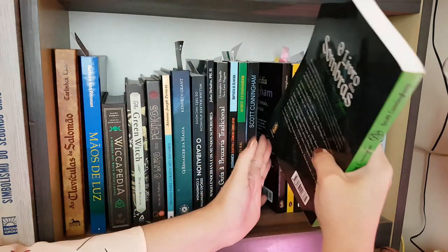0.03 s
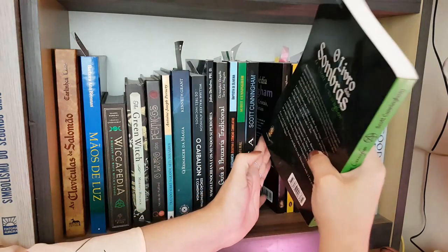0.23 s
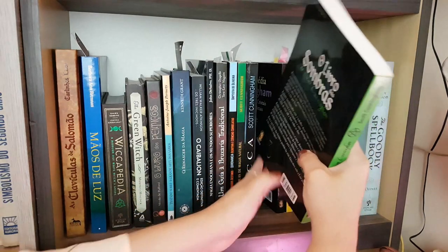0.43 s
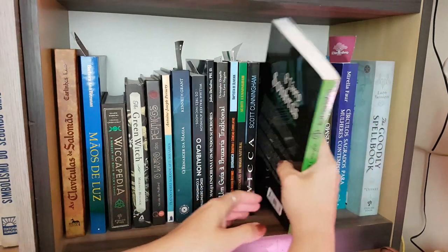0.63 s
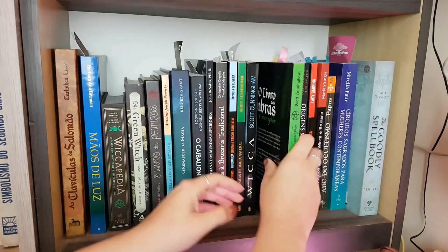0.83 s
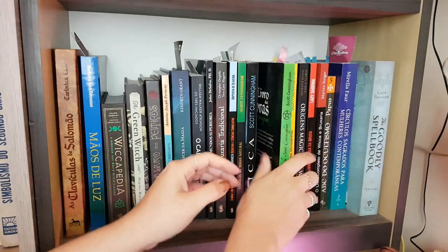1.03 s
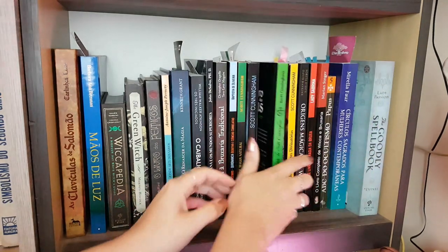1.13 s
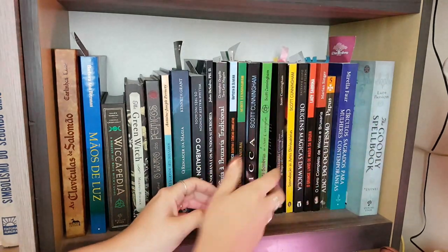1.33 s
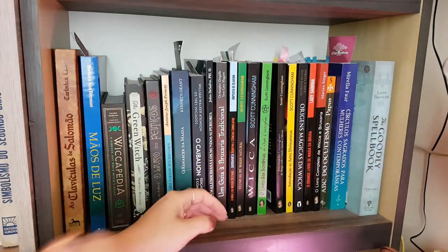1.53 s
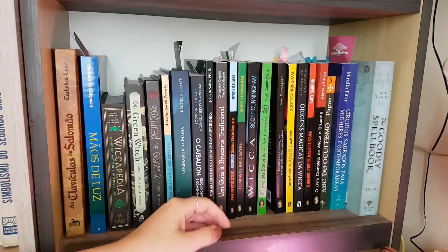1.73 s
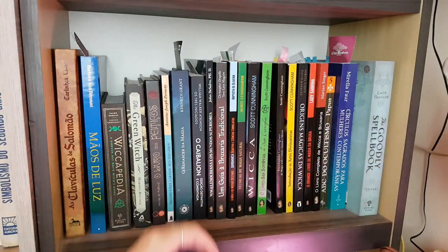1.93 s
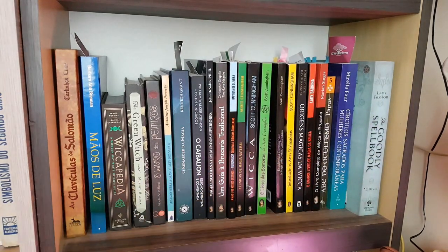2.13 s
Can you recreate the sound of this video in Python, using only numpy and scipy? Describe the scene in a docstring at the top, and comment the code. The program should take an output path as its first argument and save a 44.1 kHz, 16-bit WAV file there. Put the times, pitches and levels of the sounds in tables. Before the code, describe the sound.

A paperback is knocked into place on a wooden shelf, close to a phone in a quiet room. Light taps and brief cover creaks come from 0.05 to 0.45 s, small knocks until 0.8, then a loud clattering clack at 0.9. Covers hiss and drag from 1.0 to 1.3, ending in heavy dull thuds around 1.32-1.36. Soft hand brushing and faint ticks follow at 1.5-1.85, then near silence.

```python
"""Paperbacks are knocked into place on a wooden shelf in a quiet room, close to a phone.
Each knock is a short book tock plus ringing shelf modes; gritty noise bursts add bright clacks.
Glossy covers hiss as shaped noise and creak as stick-slip pulses; dragged books thump in tiny catches.
Hands brush, faint ticks click, and a short room tail and soft room tone lie underneath."""
import sys
import numpy as np
from scipy import signal
from scipy.fft import rfft, irfft
from scipy.io import wavfile
from scipy.ndimage import uniform_filter1d

SR = 44100
rng = np.random.default_rng(int(sys.argv[2]) if len(sys.argv) > 2 else 0)


def int16_out(signal):
    """Quantize to a 16-bit WAV file."""
    q = np.round(np.clip(np.atleast_2d(signal).T, -1, 1) * 32767)
    wavfile.write(sys.argv[1], SR, q.astype(np.int16))


def level_to_linear(level):
    """Convert decibel levels to linear amplitude factors, elementwise."""
    exponent = np.asarray(level, float) / 20
    return 10 ** exponent


N = 97020


def evened(x):
    """Scales to rms 1."""
    return x / np.sqrt(np.mean(x ** 2) + 1e-20)


def read(points, hz):
    """Reads a spectrum on a log-frequency axis."""
    f, value = np.transpose(points)
    return np.interp(np.log(hz + 1), np.log(f + 1), value)


def level(curve):
    """Turns a dB curve into a gain per sample."""
    s, db = np.transpose(curve)
    return level_to_linear(np.interp(np.arange(N) / SR, s, db))


def add(mix, s, sound):
    """Mixes a sound in at time s."""
    part = mix[..., round(s * SR):][..., :sound.shape[-1]]
    part += sound[..., :part.shape[-1]]


def rise(count, seconds):
    """A straight fade-in from 0 to 1 that then holds."""
    return np.minimum(np.arange(count) / SR / seconds, 1)


def ring(hz, t60, count):
    """One dying mode: a sine losing 60 dB in t60 seconds."""
    t = np.arange(count) / SR
    return level_to_linear(-60 * t / t60) * np.sin(2 * np.pi * hz * t)


def band(x, hz, width_hz):
    """A two-pole resonance."""
    return signal.lfilter(*signal.iirpeak(hz, hz / width_hz, SR), x)


def hiss(tone, same, patchy_db, flicker_db, size=512):
    """Stereo noise at rms 1 with drifting patches and a flicker shared by all pitches."""
    frames = N * 4 // size + 5
    hz = np.fft.rfftfreq(size, 1 / SR)
    a, b, c, d, patch = rng.standard_normal((frames, len(hz), 5)).T
    # patches span neighbouring pitches, then neighbouring moments
    patch = uniform_filter1d(patch, size=8, axis=0)
    patch = evened(uniform_filter1d(patch, size=12, axis=1))
    flicker = evened(uniform_filter1d(rng.standard_normal(frames), size=3))
    like = np.clip(read(same, hz), -1, 1)[:, None]
    left = a + 1j * b
    right = like * left + np.sqrt(1 - like ** 2) * (c + 1j * d)
    z = np.array([left, right])
    z *= level_to_linear(read(tone, hz)[:, None] + patchy_db * patch + flicker_db * flicker)
    return evened(signal.istft(z, nperseg=size, noverlap=size - size // 4)[1][:, :N])


# colour of the room tone: (frequency [Hz], relative level per Hz [dB])
AIR_COLOUR = [(9, -30), (17, -11), (50, -9), (85, -14), (135, 0), (190, -13), (280, -24), (500, -22),
              (1000, -31), (2000, -37), (4000, -45), (8500, -51), (14500, -43), (16300, -44)]
# stereo width of the room tone: (frequency [Hz], left-right likeness [-1 to 1])
AIR_LIKENESS = [(60, 1), (240, 0.14), (950, 0.96), (3770, 1), (15000, 0.084)]


def room_tone():
    """Steady soft noise with slight drifting patches, as the quiet room's background."""
    return level_to_linear(-59.5) * hiss(AIR_COLOUR, AIR_LIKENESS, patchy_db=0.91, flicker_db=0.3, size=4096)


# decay of the room: (frequency [Hz], t60 [s])
ROOM_DECAY = [(60, .22), (250, .22), (700, .27), (2000, .26), (5000, .24), (12000, .14)]
# stereo width of the tail: (frequency [Hz], left-right likeness [-1 to 1])
ROOM_LIKENESS = [(100, 1), (400, 0.96), (1000, 1), (3000, .1)]
# colour of the tail before it decays: (frequency [Hz], relative level [dB])
ROOM_COLOUR = [(40, -16.5), (150, -12), (400, -3), (1000, -3), (4000, -4), (12000, -4)]


def room(x):
    """Reverberates through a half-second noise tail, each band dying at its own speed."""
    noise = hiss(ROOM_COLOUR, ROOM_LIKENESS, patchy_db=0, flicker_db=0)[:, :SR // 2]
    hz, t, z = signal.stft(noise, SR, nperseg=512)
    z = z * level_to_linear(-60 * t / read(ROOM_DECAY, hz)[:, None])
    tail = signal.istft(z, SR, nperseg=512)[1]
    tail = tail * rise(tail.shape[1], 0.0068)
    return signal.fftconvolve(x[None], tail / np.linalg.norm(tail[0]), axes=1)[:, :N]


# colour difference of the microphone ports: (frequency [Hz], left minus right [dB])
PORT_COLOUR = [(60, 0), (200, -2), (350, 1.4), (700, 3.5), (1400, -3.6), (2800, -13), (5600, -3.5),
               (10000, 1.5)]
LEFT_LAG_S = 0.00021


def ports(x):
    """Two microphone ports a hand apart: the left hears later and with another colour."""
    hz = np.fft.rfftfreq(N, 1 / SR)
    # each side takes half of the level difference and half of the lag
    half = level_to_linear(read(PORT_COLOUR, hz) / 2) * np.exp(-1j * np.pi * hz * LEFT_LAG_S)
    return irfft(rfft(x) * np.array([half, 1 / half]), N)


# faint ticks: (time [s], starting rms level [dB], centre frequency [Hz], left minus right [dB])
FAINT_TICKS = [(1.013, -62, 9000, 2), (1.658, -63, 12500, 5), (1.7215, -48, 10500, 9),
               (1.7255, -55, 5800, 8), (1.8155, -52, 11500, 8), (1.839, -51, 4500, 4),
               (1.851, -55, 2800, 4)]
TICK_T60_S, TICK_SHARPNESS = .01, 1.4  # sharpness: centre frequency over bandwidth


def ticks():
    """Dry, quickly dying clicks of noise through a broad resonance."""
    out = np.zeros((2, N))
    for (s, db, hz, pan_db), noise in zip(FAINT_TICKS, rng.standard_normal((len(FAINT_TICKS), 600))):
        click = evened(band(noise, hz, hz / TICK_SHARPNESS))
        click = click * level_to_linear(db - 60 * np.arange(600) / SR / TICK_T60_S)
        add(out, s, click * level_to_linear(np.array([[pan_db], [-pan_db]]) / 2))
    return out


# hands brushing over covers and shelf: (time [s], level [dB])
HAND_LEVEL = [(0, -71), (.03, -70), (.07, -77.5), (.4, -72.5), (.53, -67.5), (.59, -71), (.63, -54),
              (.66, -73.5), (.7, -68), (1.4, -88.5), (1.48, -61.5), (1.56, -63.5), (1.65, -60), (1.72, -57),
              (1.8, -61), (1.83, -51.5), (1.87, -100)]
# colour of the brushing: (frequency [Hz], relative level per Hz [dB])
HAND_COLOUR = [(180, -44.5), (300, -3), (501, -10), (553, -17.5), (824, -9), (1230, -9), (2970, -8.5),
               (9000, -30.5), (11700, -54), (19800, -120)]


def hand():
    """Hands brushing over covers and shelf: mellow patchy noise that swells and fades."""
    return level(HAND_LEVEL) * hiss(HAND_COLOUR, [(300, 0.39), (1500, 0.3)], patchy_db=1.6, flicker_db=0.27)


# hiss of covers rubbing: (time [s], level before panning [dB])
SLIDE_LEVEL = [(0, -86), (.04, -68), (.07, -85), (.36, -86), (.42, -72), (.53, -70), (.58, -69),
               (.62, -64.5), (.66, -69), (.74, -60), (.78, -67.5), (.81, -61), (.835, -55), (.89, -53),
               (.93, -56.5), (1, -71.5), (1.035, -61.5), (1.065, -56.5), (1.09, -65.5), (1.12, -62),
               (1.165, -54.5), (1.21, -57), (1.31, -56), (1.33, -57.5), (1.4, -72.5), (1.5, -74.5),
               (1.7, -67), (1.82, -100)]
# colour of the rubbing: (frequency [Hz], relative level per Hz [dB])
SLIDE_COLOUR = [(800, -23.5), (1500, -6), (3000, -4), (6000, -4), (8500, -1), (12000, -1.5), (15000, -7.5),
                (16300, -9)]


def slide():
    """Glossy covers rubbing: bright, patchy, flickering noise, a little louder on the left."""
    rub = hiss(SLIDE_COLOUR, [(1000, 0.9), (8000, .1)], patchy_db=2.2, flicker_db=1.8)
    return level(SLIDE_LEVEL) * rub * level_to_linear([[.8], [-.8]])


# modes of the loaded shelf: (frequency [Hz], level before contact dulling [dB])
SHELF_MODES = [(59, -8), (101, -7), (131, -4.5), (167, -7), (205, -6), (355, -5), (389, -8), (480, -8),
               (526, -5), (576, -14), (712, -13), (797, -17.5), (1025, -16), (1430, -17)]
SHELF_T60_S = .22


def shelf_ring(count, contact_s=0):
    """The shelf's modes dying together; a longer contact excites the high ones less."""
    return sum(level_to_linear(db) * ring(hz, SHELF_T60_S, count) / (1 + (hz * contact_s) ** 2)
               for hz, db in SHELF_MODES)


# book bottoms dragging on wood: (time [s], level [dB])
DRAG_LEVEL = [(0, -55.5), (.1, -70.5), (.16, -74), (.27, -70.5), (.42, -70), (.46, -81.5), (.55, -75),
              (.59, -67), (.64, -45), (.69, -69), (.8, -55.5), (.88, -56), (1.05, -45.5), (1.11, -54.5),
              (1.16, -44), (1.22, -54), (1.27, -46.5), (1.31, -41.5), (1.4, -70.5), (1.7, -61),
              (1.85, -60.5), (2.2, -66)]
CATCHES_PER_S, CATCH_SPREAD_DB = 900, 6.5
BOOK_HZ, BOOK_WIDTH_HZ = 560, 590


def drag():
    """Tiny uneven catches at random moments thump the books and shelf."""
    strength = level_to_linear(CATCH_SPREAD_DB * np.minimum(rng.exponential(1, N), 2))
    happens = rng.random(N) < CATCHES_PER_S / SR
    catches = strength * happens * rng.choice([-1, 1], N)
    book = band(band(catches, BOOK_HZ, BOOK_WIDTH_HZ), BOOK_HZ, 1500)
    shelf = signal.oaconvolve(catches, shelf_ring(8000))[:N]
    return level(DRAG_LEVEL) * evened(evened(book) + evened(shelf))


# cover slipping: (start [s], length [s], slip level before the pulse shape [dB], slip rate [1/s])
COVER_CREAKS = [(.2875, .032, -47, 112), (.3765, .044, -41, 157)]
SLIP_JITTER, SLIP_SPREAD_DB = .05, 1.2  # jitter in slip periods


def creaks():
    """Stick-slip pulses through the cover's broad resonance and a low thump."""
    slips = np.zeros(N)
    luck = rng.standard_normal((len(COVER_CREAKS), 12, 2))
    for (s, length, db, rate), (timing, force) in zip(COVER_CREAKS, luck.transpose(0, 2, 1)):
        at = s + (np.arange(12) + SLIP_JITTER * timing) / rate
        slips[(at * SR).astype(int)] = level_to_linear(db + SLIP_SPREAD_DB * force) * (at < s + length)
    cover = ring(800, .011, count=2000) + 0.55 * ring(1130, 0.012, count=2000)
    thump = 0.29 * ring(149, 0.038, count=2000)
    pulse = (cover + thump) * rise(2000, .0012) * 1.7
    return signal.oaconvolve(slips, pulse)[:N]


# hard edge on wood: (time [s], level before the fades and final trim [dB], t60 [s])
EDGE_CLACKS = [(0.046, -49, 0.029), (0.341, -45.5, 0.0084), (.532, -52, 0.029), (.598, -62, 0.012),
               (0.628, -65, 0.025), (0.641, -50.5, 0.02), (0.765, -51.5, 0.038), (.81, -46.5, 0.016),
               (0.9011, -13.5, 0.034), (0.9024, -10, 0.03), (0.906, -15.5, 0.05), (.934, -29, 0.073),
               (1.317, -28, .04), (1.323, -30, 0.074), (1.335, -34, 0.12), (1.347, -32, 0.028),
               (1.371, -35.5, .07)]
# colour of the burst: (frequency [Hz], relative level per Hz [dB])
CLACK_COLOUR = [(400, -41), (700, -12), (1100, -2), (1600, -2.5), (2300, -4.5), (3000, -13), (4200, -21),
                (6500, -32), (10000, -45), (15000, -64.5)]
# high modes of the hard edge: (frequency [Hz], relative level [dB])
EDGE_MODES = [(1061, 5.5), (1200, -12.5), (1437, -8.5), (1600, 0.5), (1830, 1), (2250, -6), (2627, -5),
              (2950, -15.5), (3461, -11), (3800, -13), (4500, -19)]
EDGE_T60_S = .04


def clacks():
    """Short gritty bursts where a hard edge lands, ringing the edge's high modes."""
    out = np.zeros(N)
    hz = np.fft.rfftfreq(4096, 1 / SR)
    edge = sum(level_to_linear(db) * ring(f, EDGE_T60_S, count=4096) for f, db in EDGE_MODES)
    for (s, db, t60), noise in zip(EDGE_CLACKS, rng.standard_normal((len(EDGE_CLACKS), 4096))):
        fade = level_to_linear(-60 * np.arange(4096) / SR / max(t60, .005))
        grit = noise * abs(noise)  # exaggerates the peaks
        burst = evened(irfft(rfft(grit) * level_to_linear(read(CLACK_COLOUR, hz))))
        burst = burst * fade * rise(4096, .0012)
        rung = signal.fftconvolve(burst * fade, edge)[:4096]
        rung = 2 * level_to_linear(-10.5) * rung / abs(rung).max()
        add(out, s, 0.88 * level_to_linear(db) * (burst + rung))
    return out


# book edges meeting wood: (time [s], peak level of the tock [dB], tock pitch [Hz],
# contact time [ms], shelf ring peak relative to the tock [dB])
BOOK_KNOCKS = [(0.0444, -32.5, 400, 1.27, -10.5), (.0455, -40, 1090, 0.58, -12), (0.342, -58, 550, .5, 5),
               (0.4398, -25.5, 540, 1, -17), (0.448, -34, 230, 2, -3), (.479, -64, 517, 1, -27),
               (0.508, -41.5, 300, 1.5, 1), (0.528, -47.5, 400, 1.5, -29), (.626, -43.5, 700, .5, -29),
               (.631, -38, 560, .6, -4.5), (0.644, -46.5, 474, .8, -32), (0.766, -35, 652, .6, -38),
               (.791, -69, 655, .8, -8), (0.811, -27, 520, 1, -21), (0.818, -30.5, 172, 2.5, -6),
               (.8775, -39.5, 560, .8, -27), (.902, -14.5, 600, .4, -18), (0.9054, -12, 485, .4, -2.5),
               (.912, -15, 350, .6, -2.5), (.924, -18, 550, .7, -19), (0.9323, -8.5, 560, .7, -22),
               (.942, -14.5, 560, .7, -26), (.956, -20, 600, .5, -12), (.967, -26, 520, .7, -12),
               (1.013, -30, 711, .7, -10.5), (1.317, -7, 470, 1, -18.5), (1.3222, -7.5, 190, 0.65, 0),
               (1.3232, -12, 487, 1, -10), (1.335, -16, 170, 0.89, 2), (1.344, -14.5, 130.6, 2.5, -9.5),
               (1.351, -7.5, 598, 1, -13.5), (1.363, -12, 148, 2.3, -12.5), (1.416, -25, 206.4, 2, 0),
               (1.39, -21, 320, 1.2, -11.5), (1.705, -44, 977, .4, -11)]
TOCK_RISE_CYCLES, TOCK_T60_CYCLES = 1.46, 5.36


def knocks():
    """A soft blow rings the book briefly and the shelf for longer; longer contact is duller."""
    out = np.zeros(N)
    for s, db, hz, contact_ms, shelf_db in BOOK_KNOCKS:
        contact_s = contact_ms / 1000
        shelf = shelf_ring(16000, contact_s) * rise(16000, 1.2 * contact_s)
        tock = ring(hz, TOCK_T60_CYCLES / hz, count=16000) * rise(16000, TOCK_RISE_CYCLES / hz)
        blow = tock / tock.max() + level_to_linear(shelf_db) * shelf / abs(shelf).max()
        add(out, s, level_to_linear(db) * blow)
    return out


def scene():
    """Everything at the shelf, its room and the room tone."""
    near = drag() + creaks() + clacks() + knocks()
    return room_tone() + level_to_linear(-10) * room(near) + ticks() + hand() + slide() + ports(near)


def band_limit(x):
    """A steep low-pass at the top of the band."""
    return signal.sosfilt(signal.butter(12, 16470, fs=SR, output="sos"), x)


MIC_LOW_HZ, MIC_HIGH_HZ = 41.7, 16200


def record(dry):
    """The microphone's bass roll-off and upper band limit."""
    thin = signal.lfilter(*signal.butter(2, MIC_LOW_HZ, "high", fs=SR), dry)
    low_pass = signal.firwin(511, MIC_HIGH_HZ, window=("kaiser", 9), fs=SR)
    cut = signal.oaconvolve(thin, low_pass[None], "same")
    return band_limit(cut)


dry = scene()
out = record(dry)
int16_out(out)
```